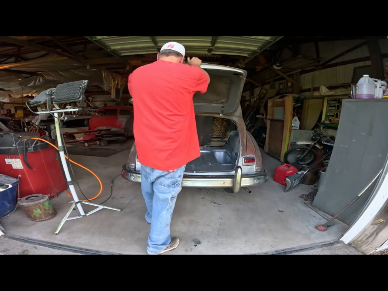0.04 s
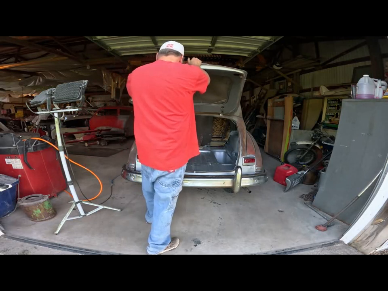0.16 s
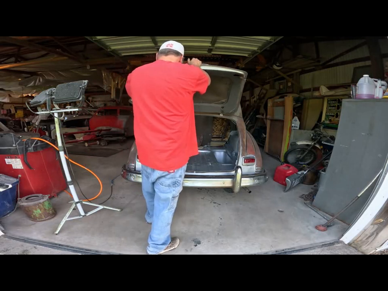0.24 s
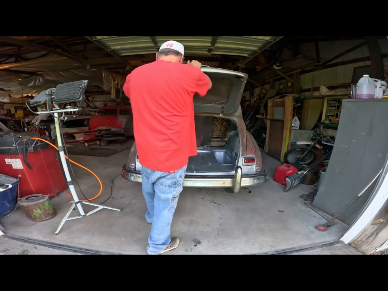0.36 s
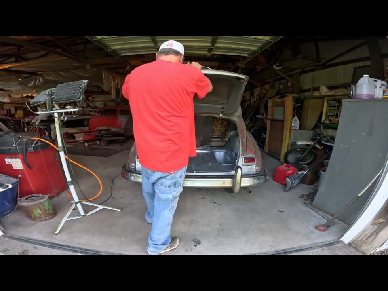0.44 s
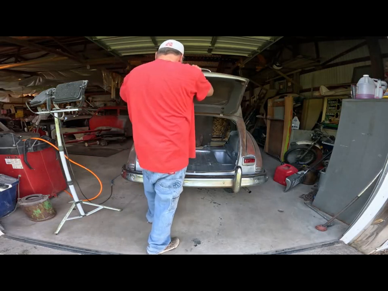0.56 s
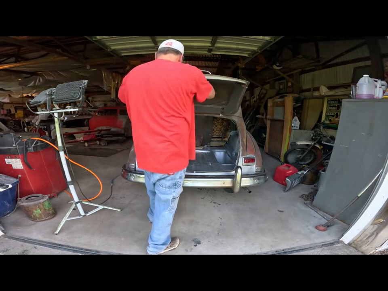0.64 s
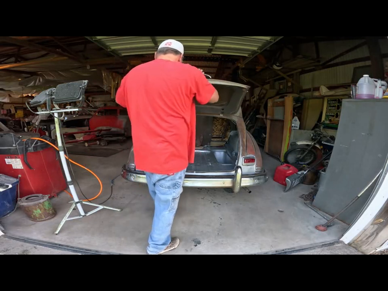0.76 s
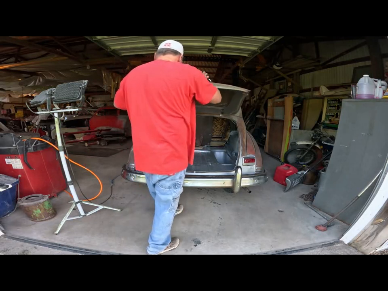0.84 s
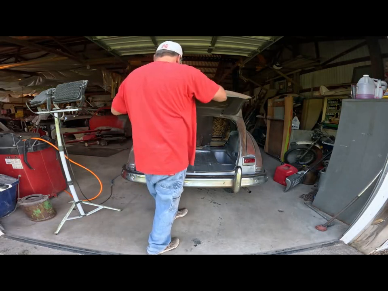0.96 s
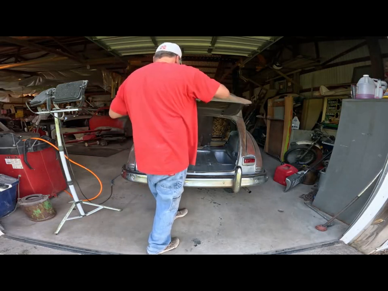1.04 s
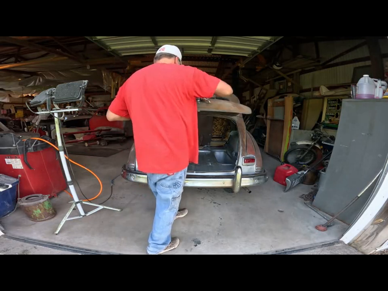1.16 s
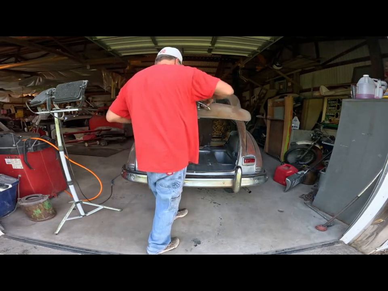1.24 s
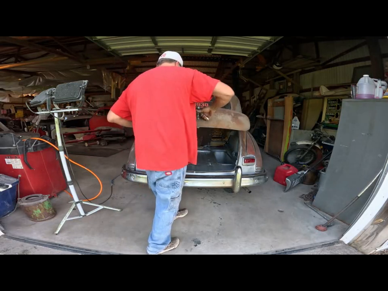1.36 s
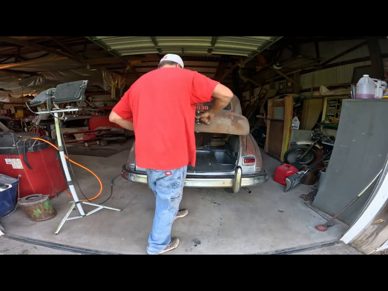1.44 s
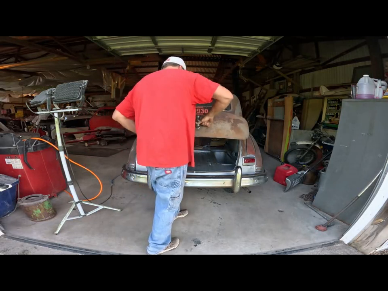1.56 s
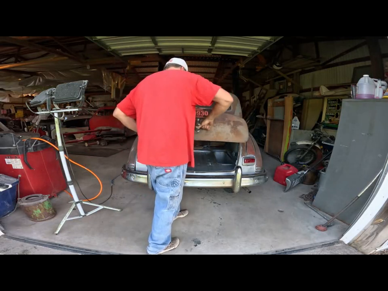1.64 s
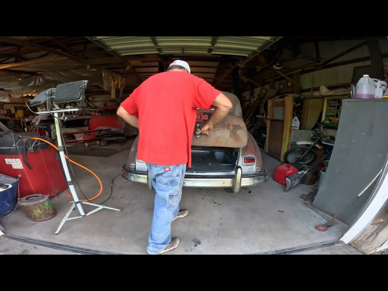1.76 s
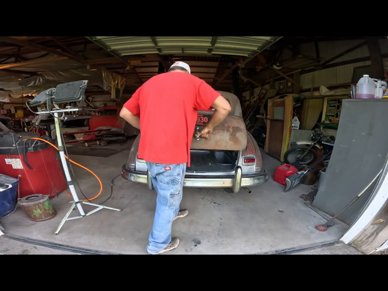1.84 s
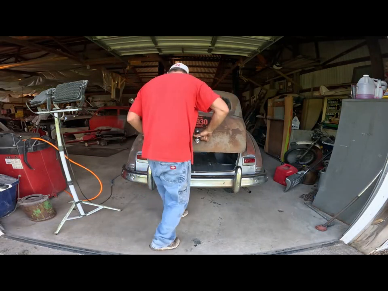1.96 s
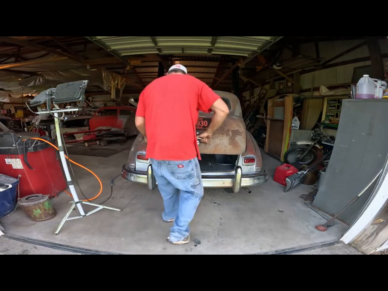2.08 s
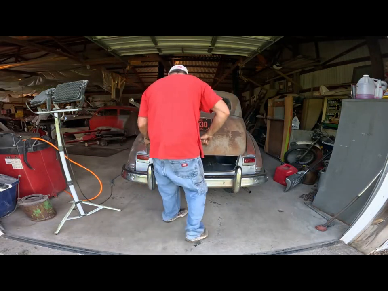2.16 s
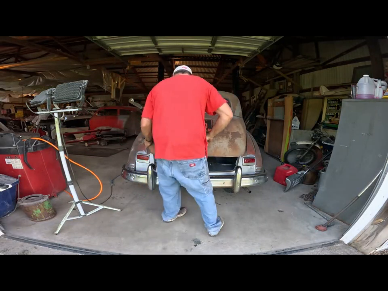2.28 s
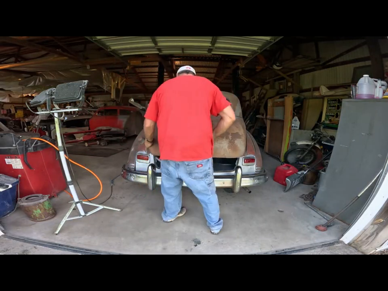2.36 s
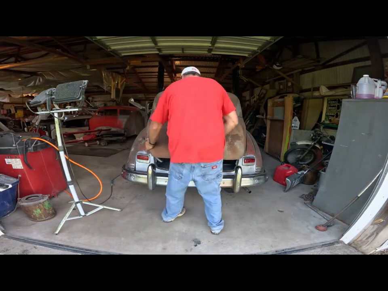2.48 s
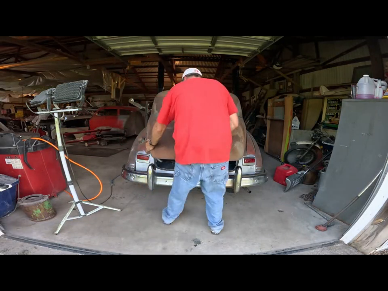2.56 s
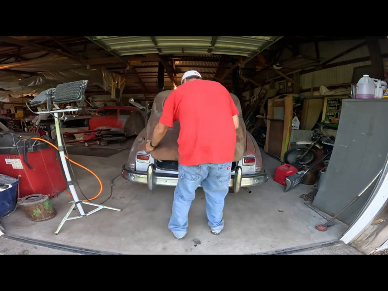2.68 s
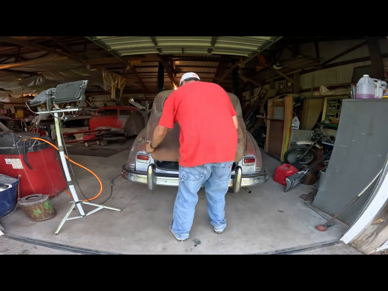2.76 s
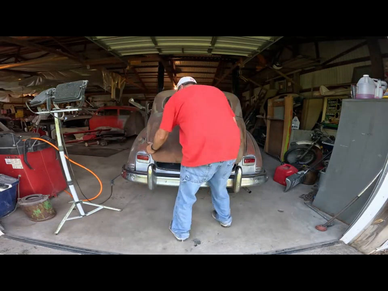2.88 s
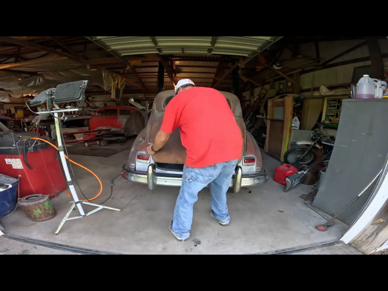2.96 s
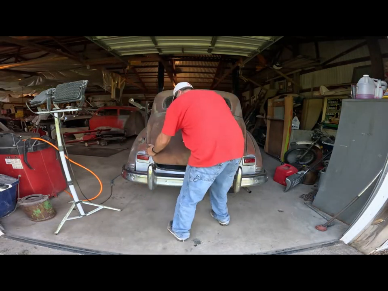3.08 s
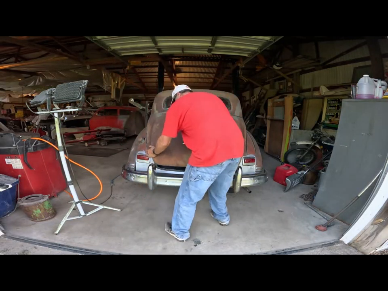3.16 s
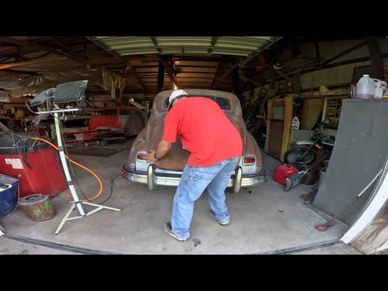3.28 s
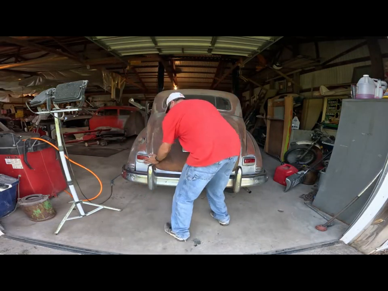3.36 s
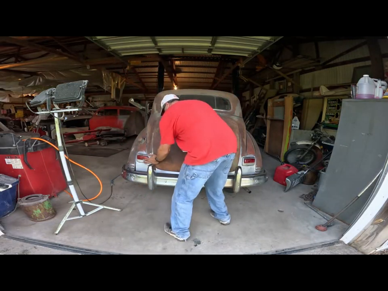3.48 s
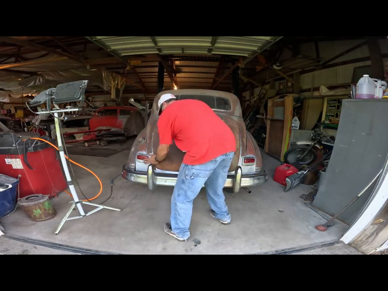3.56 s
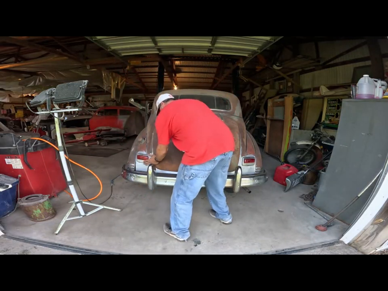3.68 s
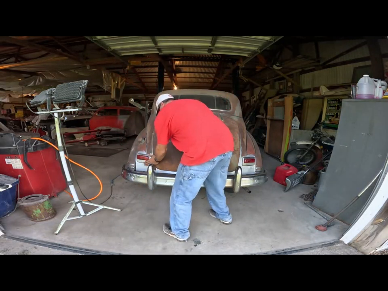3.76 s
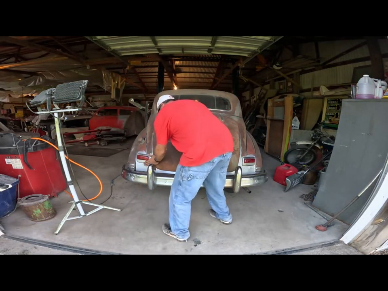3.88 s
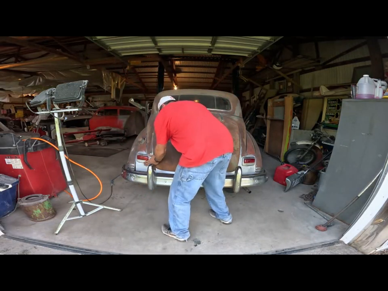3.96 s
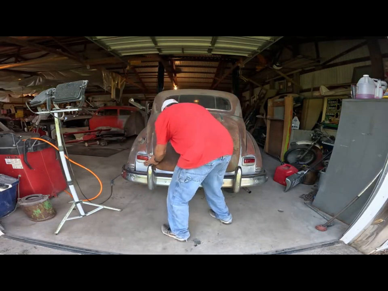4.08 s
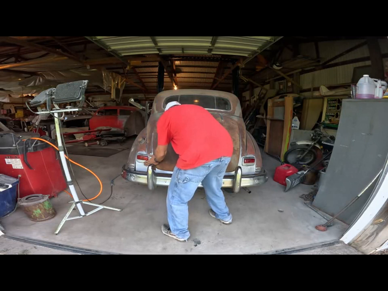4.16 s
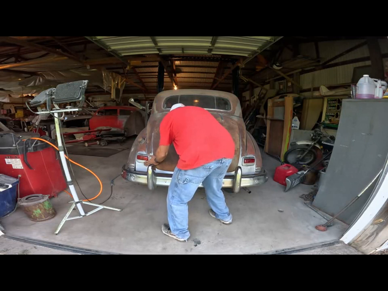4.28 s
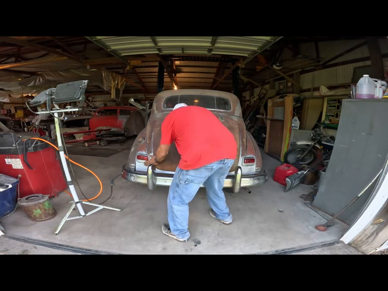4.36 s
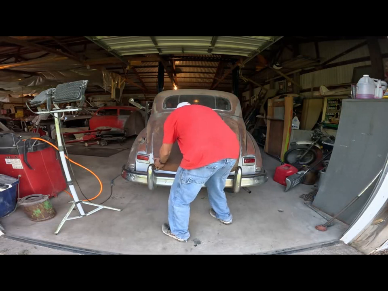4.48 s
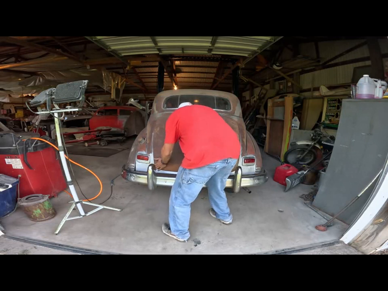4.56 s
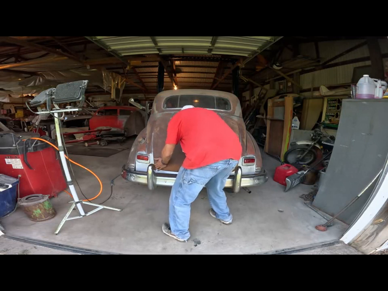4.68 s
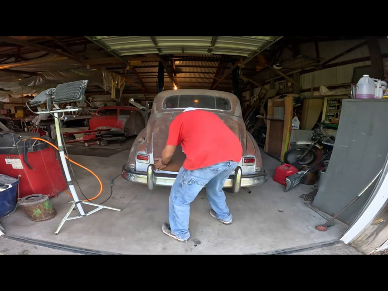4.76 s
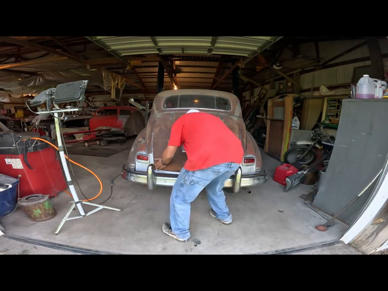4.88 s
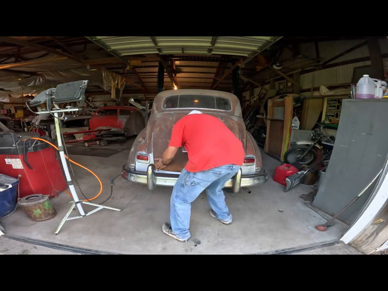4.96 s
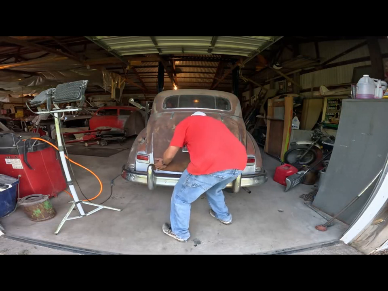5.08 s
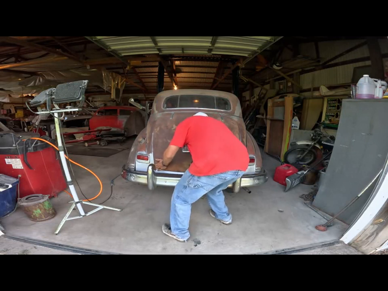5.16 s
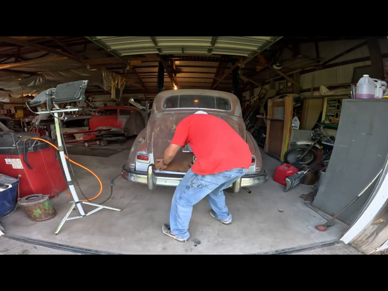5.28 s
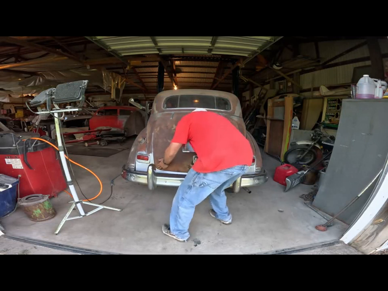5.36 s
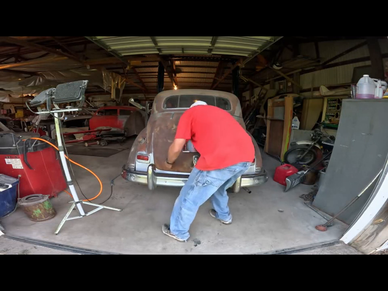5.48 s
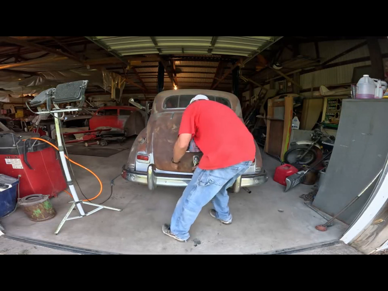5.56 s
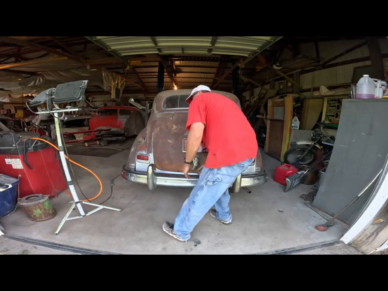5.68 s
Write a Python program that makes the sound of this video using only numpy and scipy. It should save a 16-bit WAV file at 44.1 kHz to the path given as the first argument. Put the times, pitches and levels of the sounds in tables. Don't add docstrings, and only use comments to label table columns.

```python
import sys
import numpy as np
from scipy import signal
from scipy.fft import rfft, irfft, next_fast_len
from scipy.io import wavfile
from scipy.ndimage import uniform_filter1d

SR = 44100
rng = np.random.default_rng(int(sys.argv[2]) if len(sys.argv) > 2 else 0)


def transcribe(u):
    v = np.clip(np.atleast_2d(u).T, -1, 1)
    q = np.round(v * 32767).astype(np.int16)
    wavfile.write(sys.argv[1], SR, q)


def undo_db(level):
    steps = np.asarray(level, float) / 20
    return 10 ** steps


N = 252604
TIME = np.arange(N) / SR
CENTRES = 22 * 2 ** (np.arange(29) / 3)


def on_log(table, hz):
    return np.interp(np.log(hz), np.log(np.array(table)[:, 0]), np.array(table)[:, 1])


def unit(x):
    return x / np.sqrt(np.mean(x ** 2))


def split(x):
    size = next_fast_len(len(x))
    hz = np.maximum(np.arange(size // 2 + 1) * SR / size, 1)
    place = 3 * np.log2(hz / CENTRES[0])
    spectrum = rfft(x, size)
    weights = [np.cos(np.pi / 2 * np.clip(place - k, -1, 1)) ** 2 for k in range(len(CENTRES))]
    return np.array([irfft(spectrum * weight, size)[:len(x)] for weight in weights])


def colour(x, db):
    return undo_db(db) @ split(x)


def walk(rate):
    k = int(SR / rate)
    steps = np.repeat(rng.standard_normal(N // k + 1), k)
    return 1.32 * uniform_filter1d(uniform_filter1d(steps, k), k)[:N]


def ring(x, hz, t60):
    pole = np.exp(2j * np.pi * hz / SR - np.log(1000) / (t60 * SR))
    return signal.lfilter([1], [1, -pole], x).imag


def build_up(t, rise):
    return (t / rise) ** 2 / (1 + (t / rise) ** 2)


def swell_db(s, rise, fall, edge_db):
    distance = np.where(TIME < s, (s - TIME) / rise, (TIME - s) / fall)
    return np.maximum(-abs(edge_db) * distance ** 2.76, -200)


def steel(hits, tone, modes, dense_db, modes_db, crack_db, note_db, note_t60, damping, t60, push):
    out, length = np.zeros(N + SR), int(.9 * SR)
    t = np.arange(length) / SR
    low = 1 / (1 + (CENTRES / 130) ** 4)
    high = 1 / (1 + (1200 / CENTRES) ** 4)
    mean_thump_db, mean_edge_db = np.array(hits)[:, 2:4].mean(axis=0)
    decay = t60 * (500 / CENTRES) ** damping
    swell = 1 - np.exp(-t * CENTRES[:, None])
    wash_envelope = swell * undo_db(-60 * t / decay[:, None])
    contact = 1 - np.exp(-(t / push) ** 2)
    for s, db, thump_db, edge_db, note_hz in hits:
        noise = rng.standard_normal(length)
        brighter_db = edge_db - mean_edge_db
        shape = on_log(tone, CENTRES) + low * (thump_db - mean_thump_db) + high * brighter_db
        wash = undo_db(shape) @ (split(noise) * wash_envelope)
        crack = colour(noise * np.exp(-t / 0.0016), shape) * np.exp(-t / .05)
        note = np.sin(2 * np.pi * note_hz * t) * undo_db(note_db - 60 * t / note_t60)
        tones = 0
        for (hz, mode_db, mode_t60), luck in zip(modes, rng.standard_normal(len(modes))):
            level = undo_db(mode_db + 3.7 * luck + brighter_db / (1 + (1200 / hz) ** 4))
            fade = undo_db(-60 * t / min(mode_t60, 100 / hz + .03))
            tones = tones + level * fade * np.sin(2 * np.pi * hz * (1 + 0.0057 * luck) * t)
        ringing = contact * (undo_db(dense_db) * wash + undo_db(modes_db) * tones + note)
        start = int(s * SR)
        out[start:start + length] += undo_db(db) * (ringing + undo_db(crack_db) * crack)
    return out[:N]


def lid_slam():
    # (time [s], peak level [dB], thump minus peak [dB], edge minus peak [dB], note [Hz])
    landings = [
        (3.4465, -6.5, 1, -8.5, 340),
        (3.449, -4, -10, -7, 329),
        (3.458, -8, 18, 1.5, 510),
        (3.464, -15.5, 13, 0, 116),
        (3.475, -7, -4, -31, 117),
        (3.485, -15.5, -14, -25, 126),
        (3.509, -23, 18.5, -1, 125),
        (3.534, -15, -29, 0, 121),
        (3.599, -15.5, -9, -9, 120),
        (3.649, -16.5, 2, -10, 202),
    ]
    # (frequency [Hz], level [dB])
    tone = [(15, -61), (25, -10.5), (196, -10), (450, -11), (760, -19), (960, -16), (1390, -18.5),
            (1540, -19.5), (2430, -25.5), (4040, -27), (4620, -27.5), (5140, -28.5), (9520, -42.5),
            (15000, -65)]
    # (frequency [Hz], level [dB], t60 [s])
    modes = [(167.6, -8, 0.68), (431, -6, 0.47), (569, -4.5, 0.88), (927, -2.5, 0.15), (1684, -9.5, 0.41),
             (1820, -21, 0.61), (2165, -13, .4), (2530, -20, 0.4), (3250, -10, 0.36), (3490, -15, 0.85)]
    return steel(landings, tone, modes, dense_db=11.43, modes_db=-16.0, crack_db=7.7, note_db=-7.5,
                 note_t60=0.034, damping=0.22, t60=0.43, push=.0003)


def boom():
    # (frequency [Hz], waver share [1], level [dB], rise [s], t60 [s])
    swings = [
        (30.07, 0.028, -7.5, 0.025, 0.53),
        (63, 0.045, -14, 0.0095, 0.47),
        (178.8, 0.043, -20, 0.026, 0.49),
    ]
    # (time [s], level [dB], extra level of the panel [dB])
    jolts = [
        (3.444, -0.5, 1.5),
        (3.59, -15, -13),
        (3.84, -27.5, 18),
        (3.95, -23.5, 15),
        (4.03, -20.5, -9),
    ]
    seal_s = 3.477
    out = 0
    for hz, waver, db, rise, t60 in swings:
        envelope = 0
        for s, jolt_db, panel_db in jolts:
            t = np.maximum(TIME - s, 0)
            level_db = db + jolt_db + panel_db * (hz > 100)
            envelope = envelope + undo_db(level_db - 60 * t / t60) * build_up(t, rise)
        turns = np.cumsum(hz * (1 + waver * walk(14))) / SR
        out = out + envelope * np.cos(2 * np.pi * (turns - turns[int(seal_s * SR)]))
    return out


def latch_blow():
    # (time [s], peak level [dB], thump minus peak [dB], edge minus peak [dB], note [Hz])
    contacts = [
        (5.1525, -28.5, -22, -3, 1220),
        (5.1565, -31, -23, -0.5, 1110),
        (5.159, -5.5, -8.5, -5, 1154),
        (5.1605, -11.5, -4, -6.5, 1568),
        (5.1625, -11.5, -4, -8, 598),
        (5.1665, -10.5, -4, -12, 413),
        (5.174, -13.5, -12, -5, 188),
        (5.184, -23, -26, -8, 642),
    ]
    # (frequency [Hz], level [dB])
    tone = [(25, -15), (50, -9.5), (140, 4), (200, 6), (270, -7), (420, 4), (640, -5), (850, -19),
            (1200, 2.5), (1900, -8.5), (3800, -14), (4500, -13), (6700, -17.5), (9000, -27.5), (12000, -42),
            (15000, -67)]
    # (frequency [Hz], level [dB], t60 [s])
    modes = [(197, 7, 0.051), (410, -33, 0.091), (609, -4, 0.078), (1130, 5.5, 0.02), (1680, -25, 0.37),
             (1790, -32, 0.13), (2840, -13, 0.03), (4300, -2, 0.025), (5500, -45, 5.0), (6700, 3.5, 0.012)]
    return steel(contacts, tone, modes, dense_db=1.3, modes_db=-13.0, crack_db=10.4, note_db=-5,
                 note_t60=0.035, damping=0.14, t60=0.21, push=.0003)


def brackets():
    # (time [s], frequency [Hz], level [dB], rise [s], t60 [s])
    notes = [
        (3.51, 4764, -11, 0.024, 0.14),
        (3.5, 4538, -27, .015, .2),
        (3.455, 5642, -26, .008, .2),
        (3.46, 1567, -23, .01, .22),
        (3.46, 931, -23, .01, .2),
        (3.47, 2783, -26, .01, .3),
        (3.52, 4230, -28, .02, .15),
    ]
    # (frequency [Hz], width [Hz], level [dB])
    plate = [(635, 140, -30.5), (953, 150, -31.5), (1260, 420, -26), (1650, 320, -28), (1890, 310, -29),
             (2490, 110, -33.5), (2950, 160, -35), (3430, 340, -37), (4530, 440, -35), (6640, 590, -42.5)]
    plate_s, plate_rise_s, plate_t60_s = 5.159, 0.0057, 0.66
    out, chatter = 0, rng.standard_normal(N)
    for s, hz, db, rise, t60 in notes:
        t = np.maximum(TIME - s, 0)
        note = np.sin(2 * np.pi * hz * t) + .6 * unit(ring(chatter, hz, 0.04))
        out = out + undo_db(db - 60 * t / t60) * build_up(t, rise) * note
    crowd = 0
    for hz, width, db in plate:
        crowd = crowd + undo_db(db) * unit(ring(ring(chatter, hz, 1.2 / width), hz, 1.3 / width))
    t = np.maximum(TIME - plate_s, 0)
    return out + crowd * undo_db(-60 * t / plate_t60_s) * (1 - np.exp(-t / plate_rise_s))


def trim():
    # (time [s], level [dB])
    tap_table = [(3.6758, -30), (3.7283, -31.5), (3.769, -35), (3.822, -38), (3.8617, -35.5),
                 (3.913, -37.5), (3.9522, -37), (4.0034, -37), (4.043, -36), (4.093, -35), (4.1343, -35.5),
                 (4.18, -35), (4.223, -35), (4.267, -37), (4.3116, -35), (4.357, -34), (4.4011, -36.5),
                 (4.443, -36.5), (4.4879, -38), (4.529, -38), (4.5723, -40), (4.612, -42)]
    # (frequency [Hz], width [Hz], level [dB])
    resonances = [(2480, 640, -47), (3040, 470, -8.5), (3375, 560, -6), (4485, 1200, -12), (5210, 870, 9.5),
                  (6600, 1200, 9), (7670, 380, 1), (9100, 680, -4.5), (13000, 1500, -33)]
    top_db, scatter_db, room_db = -10.5, 1.2, -11
    fade_s, linger_s = 0.011, 0.042
    s, tap_db = np.transpose(tap_table)
    at = (SR * (s - .002)).astype(int)
    luck_db = scatter_db * rng.standard_normal((len(resonances), len(tap_table)))
    fade, linger = ([1, -np.exp(-1 / (seconds * SR))] for seconds in (fade_s, linger_s))
    noise, out = rng.standard_normal(N), 0
    for (hz, width, db), chance_db in zip(resonances, luck_db):
        taps = np.zeros(N)
        taps[at] = undo_db(tap_db + chance_db + db / 2)
        envelope = signal.lfilter([1], fade, taps)
        if hz < 4500:
            envelope = envelope + undo_db(room_db) * signal.lfilter([1], linger, taps)
        else:
            envelope = undo_db(top_db) * envelope
        envelope = uniform_filter1d(envelope, size=60, origin=29)
        out = out + envelope * unit(ring(ring(noise, hz, 1.8 / width), hz, 1.96 / width))
    return undo_db(-9.5) * out


def knocks():
    # (time [s], peak level [dB], thump minus peak [dB], edge minus peak [dB], note [Hz])
    stay = [(0.002, -10.5, -26, -14, 495), (0.008, -12, -40, -17, 233.7), (0.049, -41, -6, -19, 500),
            (0.082, -23, -16, -30, 246), (0.488, -31.5, -9, -3.5, 482), (0.495, -25, -11, -14, 186),
            (0.543, -30, -15, -27, 237), (0.549, -17.5, -17, -31, 253), (0.566, -30.5, -10, -16, 218),
            (0.576, -25.5, -8, -15, 205), (0.607, -32, 5, -32, 110), (0.62, -32, -9, -32, 202),
            (0.772, -32.5, -1, -6, 150), (0.8, -29, -16, -33, 298), (0.903, -36, 5.5, -4, 294),
            (1.02, -35.5, -16, -20, 270), (1.09, -40.5, -29, 4, 827), (1.158, -38.5, -11, -5, 600),
            (1.39, -34, -13, -20, 286), (1.464, -23.5, -28, -22, 560), (1.509, -27.5, -8, -24, 478),
            (1.617, -32, -34, -18, 309), (1.647, -25, -12, -11.5, 334), (1.634, -30, -31, -13, 526),
            (1.669, -29, -35, -17, 437)]
    bumps = [(2.848, -24, -6, -21, 170), (3.04, -33.5, 0, 5, 257), (3.8, -27, 4, -26, 315),
             (3.87, -27, -7, -22, 180), (3.96, -29, -26, -24, 171), (3.915, -31, -15, -22, 250),
             (3.99, -33, -14, -20, 260), (4.021, -29.5, -7, -6, 158), (4.071, -32, -27, -10, 548),
             (4.085, -29, -19, 1, 561), (4.103, -26, -19, 4.5, 606), (4.111, -28.5, -15, -2.5, 420),
             (4.133, -32, -17, -8, 264), (4.161, -32, -5, 0.5, 637), (4.816, -31, -32, -17, 195),
             (4.914, -33.5, -20, -9, 183)]
    # (frequency [Hz], level [dB])
    tone = [(15, -24), (25, -14.5), (107, -5.5), (244, -2.5), (344, -7), (460, -8), (703, -18),
            (916, -15.5), (2140, -27), (7610, -58), (14000, -71)]
    # (frequency [Hz], level [dB], t60 [s])
    modes = [(242.2, -11.5, 0.25), (440, -4, 0.16), (526, -2.5, 0.12), (638.6, -5, 0.23), (783, -16, 0.24),
             (892, -10, 0.29), (1235, -11, 0.07), (1450, -49, 0.56), (1830, -50, 0.18), (2100, -25, 0.15)]
    return sum(steel(hits, tone, modes, dense_db=13.0, modes_db=-13.5, crack_db=1.5, note_db=-1.2,
                     note_t60=0.39 * t60, damping=0.19, t60=t60, push=.002)
               for hits, t60 in [(stay, 0.29), (bumps, 0.18)])


def scuffs():
    # (time of peak [s], rise [s], fall [s], level [dB], hiss minus level [dB])
    slides = [(0.498, 0.018, 0.034, -50.5, -2.5), (0.903, 0.0092, 0.043, -50, -0.5),
              (1.45, 0.1, 0.13, -60, -3.5), (1.1, 0.29, 0.36, -57.5, -8), (2.014, 0.035, 0.16, -50.5, -7),
              (2.16, 0.064, 0.079, -54, -6.5), (2.32, 0.059, 0.085, -57, -7),
              (2.468, 0.0063, 0.038, -55.5, 2.5), (2.64, 0.048, 0.11, -52.5, -4.5),
              (2.705, 0.033, 0.031, -52.5, 2.5), (2.758, 0.015, 0.02, -32.5, -11),
              (2.779, 0.023, 0.025, -26.5, -15), (2.803, 0.022, 0.039, -28.5, -13),
              (2.83, 0.016, 0.022, -36, -11), (2.9, 0.027, 0.035, -48, -7),
              (2.935, 0.031, 0.038, -44.5, -11), (2.985, 0.033, 0.016, -43, -4.5),
              (3.021, 0.01, 0.032, -55, 3), (3.05, 0.02, 0.014, -38, -6.5), (3.256, 0.11, 0.078, -42.5, -9),
              (3.43, 0.024, 0.066, -56.5, -7), (4.59, 0.15, 0.16, -48, -6), (4.964, .008, .015, -58, 1),
              (4.985, 0.016, 0.062, -49, -0.5), (5.033, 0.0027, 0.0047, -53, 2),
              (5.082, .005, 0.018, -67, 3), (5.13, 0.12, 0.11, -52.5, -7), (5.47, 0.44, 0.12, -56, -7),
              (5.576, 0.055, 0.045, -57, -8)]
    # (frequency [Hz], level [dB])
    tone = [(300, -11), (600, -9), (1100, -8), (1600, -3), (2200, -1), (2900, 0), (4000, -7.5), (7000, -15),
            (10000, -23.5), (12000, -36), (15500, -46)]
    grit = rng.standard_normal(N) * undo_db(1.9 * rng.exponential(1, N)) * undo_db(2.2 * walk(150))
    bands = split(grit) * undo_db(on_log(tone, CENTRES))[:, None]
    part = np.digitize(CENTRES, [1550, 4500])
    drag, rasp, hiss = (unit(bands[part == k].sum(axis=0)) for k in range(3))
    out = 0
    for s, rise, fall, db, hiss_db in slides:
        drag_db = 0.5 - 0.42 * (db + 52.5)
        rub = undo_db(drag_db) * drag + rasp + undo_db(hiss_db) * hiss
        out = out + undo_db(db + swell_db(s, rise, fall, -33.5)) * rub
    return out


def birds():
    # (start [s], length [s], from [Hz], to [Hz], level [dB])
    whistles = [(.128, .068, 2800, 2120, -51.5), (.645, .035, 3225, 3260, -57),
                (.672, .022, 3270, 3230, -48.5), (.69, .065, 3200, 3140, -53.5),
                (.752, .035, 3180, 3000, -55), (.79, .05, 3100, 3000, -61), (.692, .058, 2760, 2690, -55),
                (.752, .035, 2750, 2560, -56), (1.176, .016, 2310, 2340, -52),
                (1.192, .022, 2550, 2800, -59), (1.195, .055, 2950, 2960, -61),
                (1.255, .06, 2930, 2920, -62), (1.215, .02, 2400, 2230, -50),
                (1.233, .018, 2170, 2010, -54), (1.255, .035, 1900, 1780, -59),
                (1.332, .018, 2200, 2800, -56), (1.346, .022, 3000, 3150, -49),
                (1.37, .02, 3180, 3110, -54), (1.39, .04, 3150, 3150, -61), (1.381, .028, 2560, 2460, -53),
                (1.415, .045, 2490, 2480, -51.5), (1.465, .07, 2500, 2470, -54),
                (1.533, .014, 2480, 2250, -57)]
    out = 0
    for s, length, from_hz, to_hz, db in whistles:
        end = s + length
        hz = np.interp(TIME, [s, end], [from_hz, to_hz])
        gate = np.clip(np.minimum(TIME - s, end - TIME) / 0.0026, 0, 1)
        rise = .35 * length
        phase = 2 * np.pi * np.cumsum(hz * (1 + 0.006 * walk(200))) / SR
        level_db = db + swell_db(s + rise, rise, length - rise, -7) + 1.5 * walk(80)
        out = out + gate * undo_db(level_db) * (np.sin(phase) + .18 * np.sin(.96 * phase))
    return out


def background():
    # (time [s], level [dB])
    gain = [(0, 6.5), (.4, 1.5), (.7, 6.5), (1.1, 5.5), (1.55, 6), (1.9, 3.5), (2.5, 3.5), (2.9, 4),
            (3.3, 3.5), (5.55, 0), (5.65, -4.5), (5.73, -3)]
    # (time [s], half width [s], level [dB])
    rumbles = [
        (.08, 0.21, 24.5),
        (.6, 0.22, 12.5),
        (1.6, 0.17, 18),
        (2.2, 0.12, -1),
        (2.9, .1, 9),
        (4.1, 0.43, 12),
        (4.6, 0.43, 7),
        (4.85, 0.11, 12.5),
        (5.12, 0.099, 17),
        (5.65, .1, -10),
    ]
    # (frequency [Hz], level [dB])
    air_tone = [(22, 0.5), (60, -1), (90, -5), (190, -3), (400, -9), (630, -5), (850, -16), (1300, -12.5),
                (2600, -18.5), (4000, -28.5), (5200, -24), (8000, -37), (12500, -50.5), (15500, -78)]
    # (frequency [Hz], level [dB])
    hum_lines = [(59.2, -56), (177.6, -55.5), (199.2, -59.5), (258.4, -63), (317.6, -62.5), (376.8, -63),
                 (516.8, -66), (576.0, -64.5), (1071, -68.5), (1351, -69), (1389, -69), (1453, -69.5)]
    rumble_db = sum(db * np.exp(-((TIME - s) / width) ** 2) for s, width, db in rumbles)
    swell, air, hum = walk(1.18), 0, 0
    for hz, band in zip(CENTRES, split(rng.standard_normal(N))):
        moving_db = 0.78 * swell + 0.95 * walk(3.64) + rumble_db / (1 + (hz / 110) ** 3)
        air = air + band * undo_db(on_log(air_tone, hz) + moving_db)
    for hz, db in hum_lines:
        turns = hz * TIME + 0.078 * walk(4.71) + rng.random()
        hum = hum + undo_db(db + 1.0 + 2.8 * walk(8.6)) * np.sin(2 * np.pi * turns)
    return undo_db(np.interp(TIME, *np.transpose(gain))) * (undo_db(-47.5) * unit(air) + hum)


def garage(x, t60_share):
    # (frequency [Hz], t60 [s])
    room_t60 = [(60, 1), (300, 0.82), (1500, 0.89), (5000, 0.73), (12000, 0.8)]
    t = np.arange(SR) / SR
    decay = t60_share * on_log(room_t60, CENTRES)[:, None]
    answer = (split(rng.standard_normal(SR)) * undo_db(-60 * t / decay)).sum(axis=0) * np.clip(t / 0.0015, 0, 1)
    return signal.fftconvolve(x, answer / np.sqrt(np.sum(answer ** 2)))[:N]


def far_end(x):
    delay_s, spread_s, level_db, centre_hz = .115, .085, -12, 1900
    t = np.arange(SR // 2) / SR
    echoes = colour(rng.standard_normal(len(t)), -3.5 * np.log2(CENTRES / centre_hz) ** 2)
    answer = echoes * np.exp(-((t - delay_s) / spread_s) ** 2)
    return undo_db(level_db) * signal.fftconvolve(x, answer / np.sqrt(np.sum(answer ** 2)))[:N]


def two_ports(mid):
    # (frequency [Hz], coherence [0-1])
    likeness = [(30, 1), (250, 0.996), (1000, 0.95), (2000, .93), (4000, 0.92), (8000, .75), (14000, 0.8)]
    # (frequency [Hz], left minus right [dB])
    left_lean = [(60, .5), (125, -.1), (250, -1.1), (500, -1.4), (1000, -1.2), (2000, -.3), (4000, 0),
                 (8000, .6)]
    like = np.clip(on_log(likeness, CENTRES), 0, .9999)
    side = colour(garage(mid, .1), 10 * np.log10((1 - like) / (1 + like)))
    lean_db = on_log(left_lean, CENTRES) / 2
    return np.array([colour(mid + side, lean_db), colour(mid - side, -lean_db)])


def scene():
    blows = lid_slam() + latch_blow()
    hits = blows + knocks()
    small = brackets() + trim() + scuffs()
    far = birds()
    mid = hits + undo_db(-13.0) * garage(hits, 1.0) + undo_db(-6.5) * far_end(blows)
    mid = mid + small + undo_db(-9) * garage(small, .6)
    mid = mid + undo_db(2.5) * far + undo_db(-6) * garage(far, 0.5)
    mid = mid + background()
    return two_ports(mid) + boom()


def band_limit(x):
    return signal.sosfilt(signal.butter(12, 15700, fs=SR, output="sos"), x)


def record(dry):
    # (frequency [Hz], phase [rad])
    port_lag = [(20, 0.012), (300, 0.2), (1000, 0.36), (2500, 0.62), (5000, 0.39), (8600, 0.6),
                (12000, 0.85)]
    size = next_fast_len(N)
    lag = on_log(port_lag, np.arange(size // 2 + 1) * SR / size + 1)
    left = irfft(rfft(dry[0], size) * np.exp(-1j * lag), size)[:N]
    soft = np.tanh(0.26 * np.array([left, dry[1]])) / 0.34
    top_cut = signal.butter(8, 14800, fs=SR, output="sos")
    return band_limit(signal.sosfilt(top_cut, soft))


dry = scene()
out = record(dry)
transcribe(out)
```